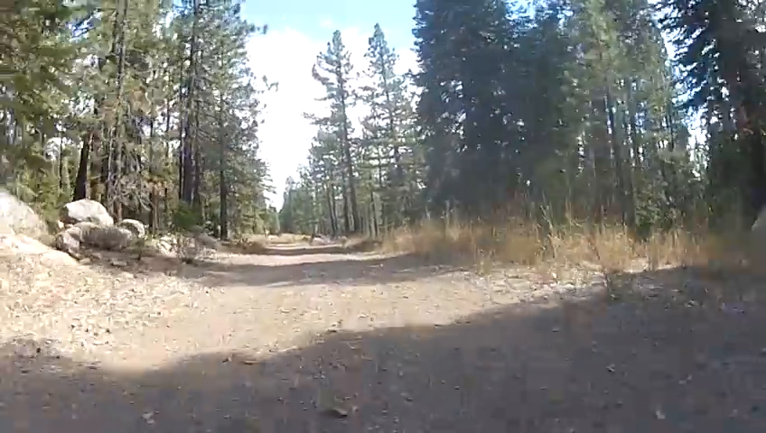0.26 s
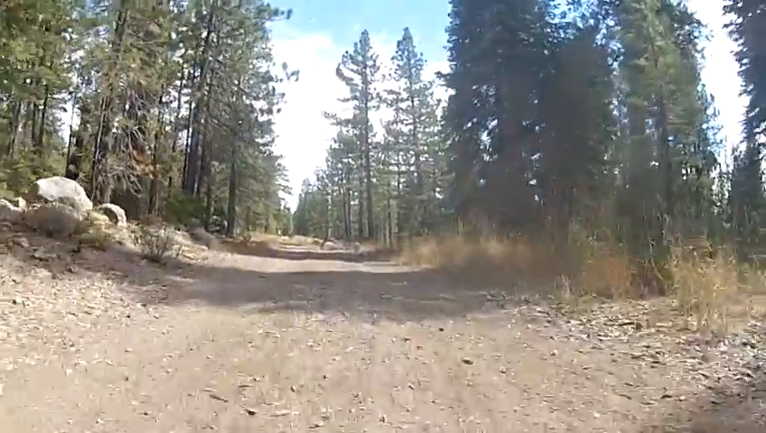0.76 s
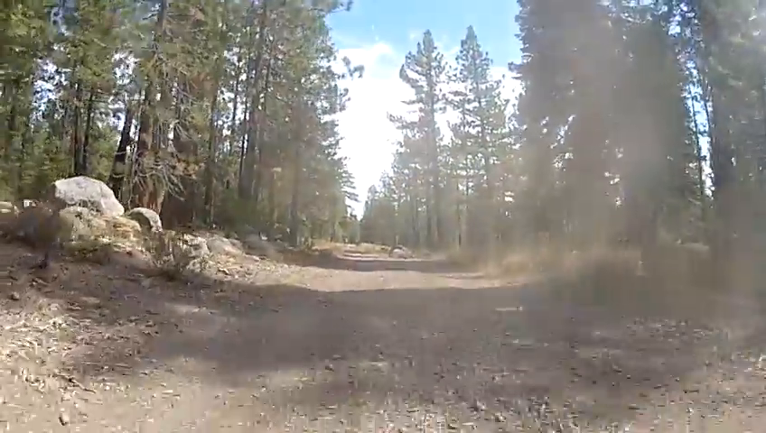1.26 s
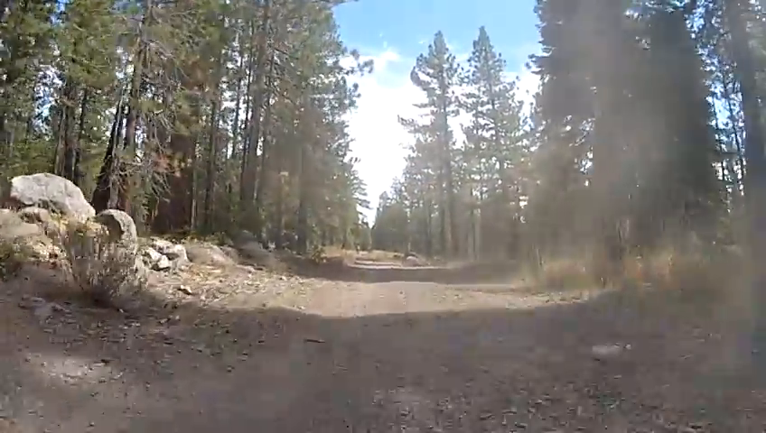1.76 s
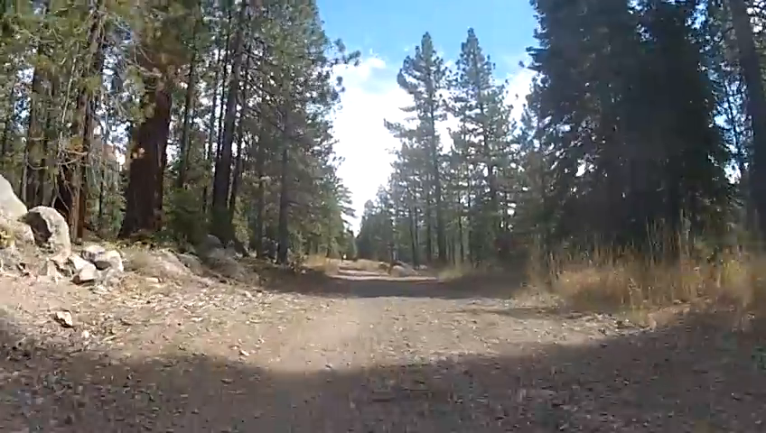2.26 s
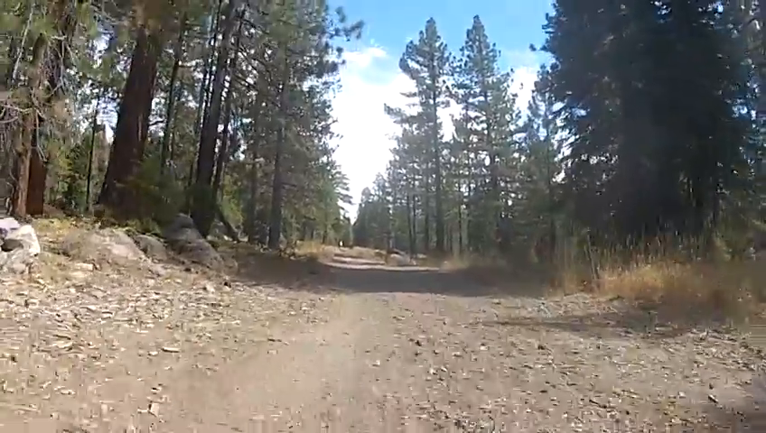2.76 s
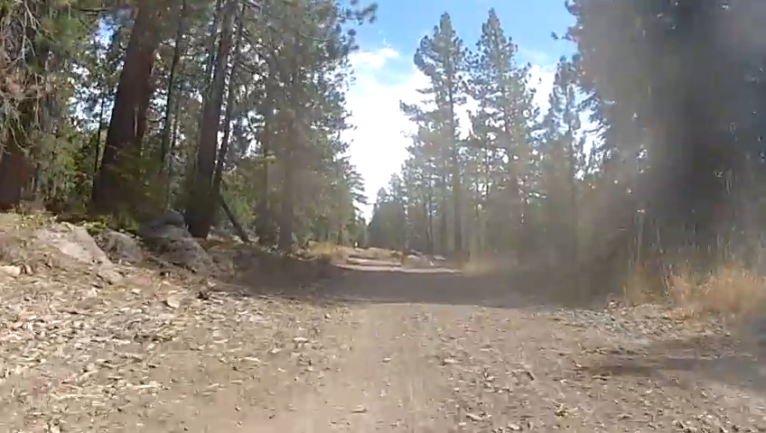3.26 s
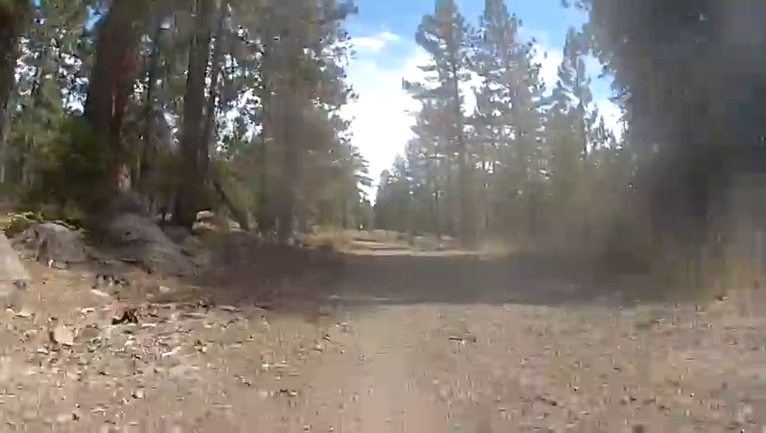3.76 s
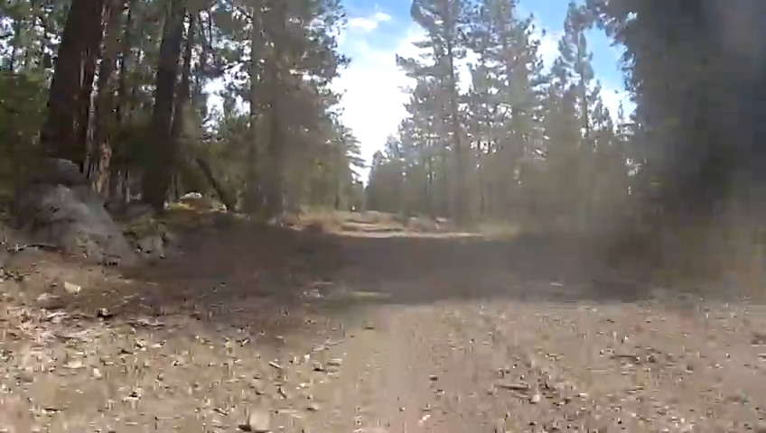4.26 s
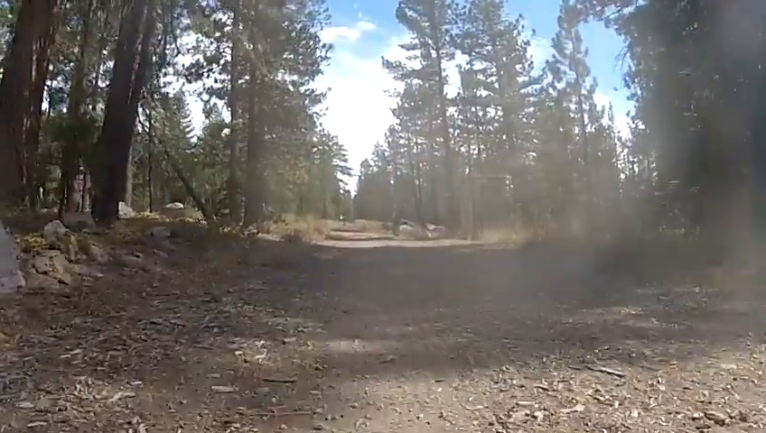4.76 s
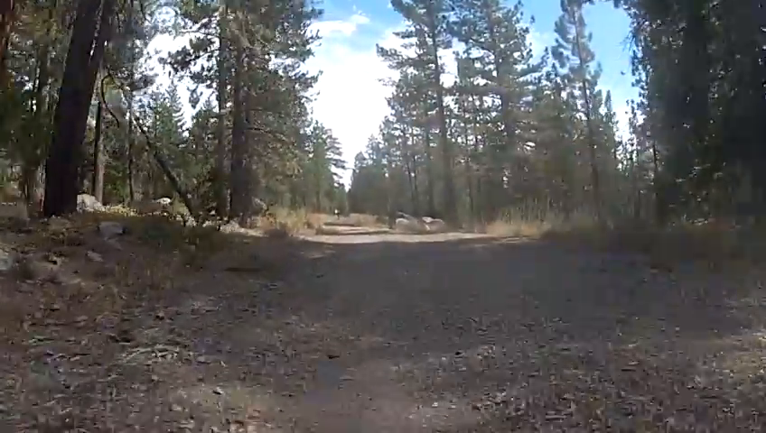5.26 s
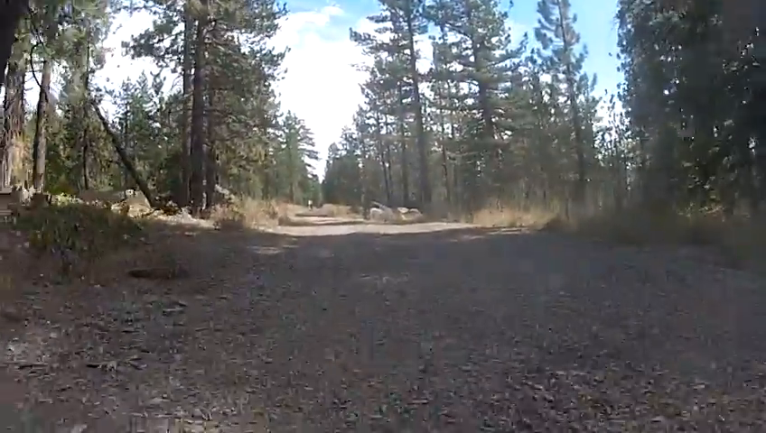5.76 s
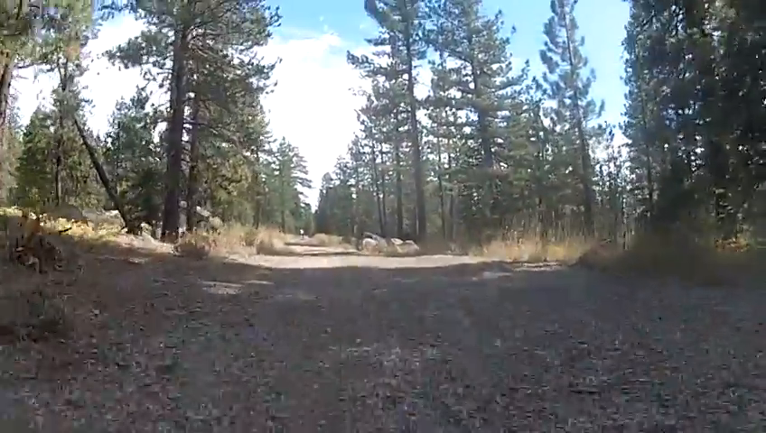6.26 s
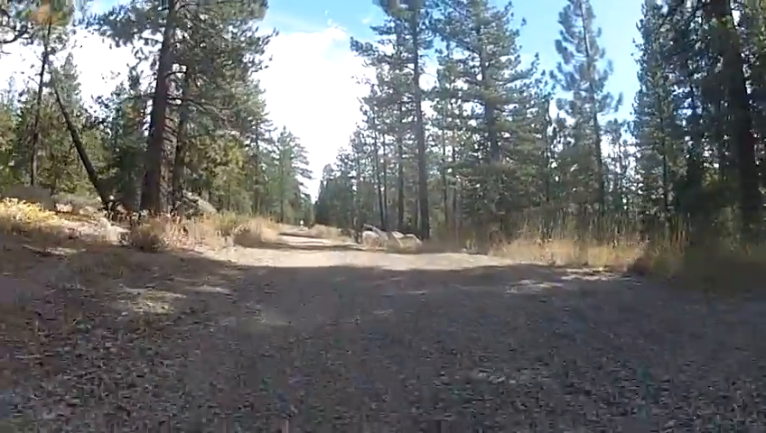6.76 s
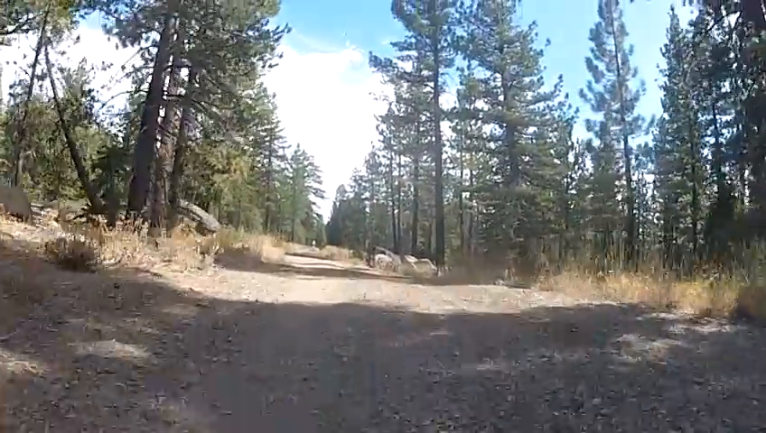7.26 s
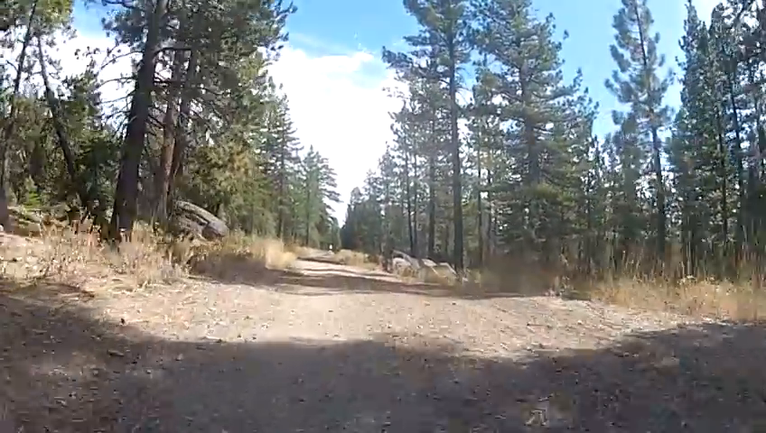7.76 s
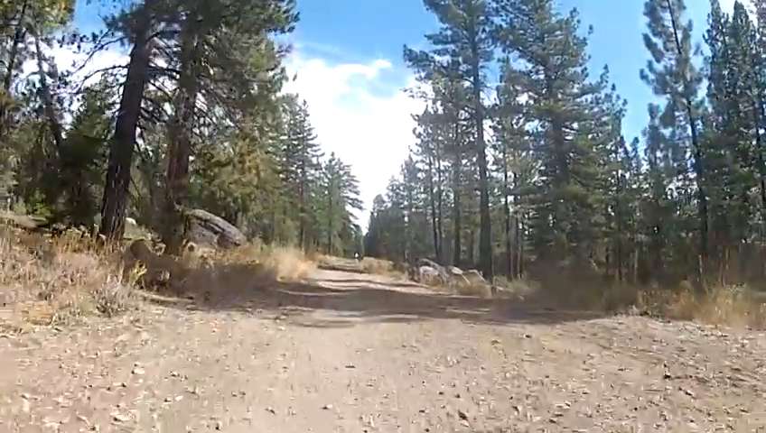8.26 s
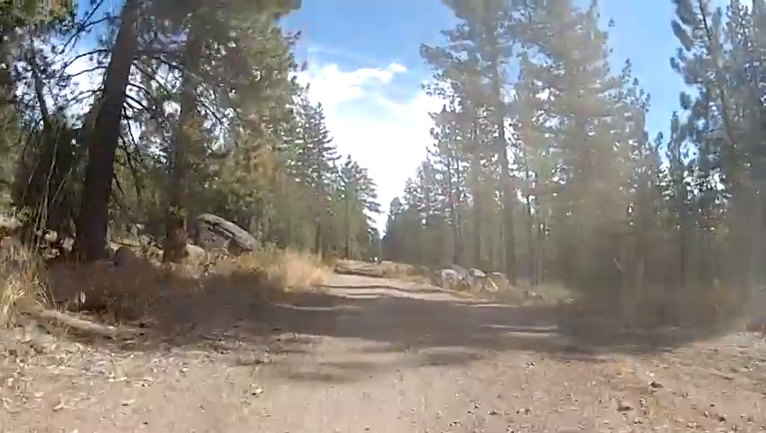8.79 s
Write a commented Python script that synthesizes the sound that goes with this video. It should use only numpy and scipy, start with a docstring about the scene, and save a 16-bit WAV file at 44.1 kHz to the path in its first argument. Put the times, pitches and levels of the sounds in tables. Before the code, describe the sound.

Wheels roll over a dirt and gravel trail for nine seconds, heard close and dry through the vehicle's frame and the microphone's mount. A low, boxy, uneven rumble and quieter gritty crunch run throughout, with a gritty, lo-fi treble. From 0 to 1 s, thuds and hard clacks crowd together, and a small loose metal part pings at about 0.85. A sharp clack lands near 2.0; bumps and snapping pebbles cluster from 2.3 to 3.4, the brightest crack near 3.1. Another clack strikes at 3.7, then a slightly calmer stretch with brief gravel slips. From 4.6 to 5.4 the rumble surges with heavy jolts, grinding stones and faint pings; a clack follows at 5.6. Clear short pings return at 6.1 and 7.15 among scattered knocks, with a solid thud at 7.6 and soft rumbling dips around 8. A last ping sounds at 8.7, final jolts at 8.8 to 8.9, still rolling.

```python
"""Wheels roll along a dirt and gravel trail for nine seconds, heard close up through the vehicle's frame.
From the start, random trains of pushes ring the resonant frame and mount, and grit crunches under the tyres.
Jolts crowd the first second, and a small metal part pings before it is over, as decaying modes, and again
now and then. Pebbles snap, most thickly near three seconds; the rumble is strong again at about five, and the
last ping and jolt come just before the end. Throughout, each sample is held, which adds a gritty treble."""
import sys
import numpy as np
from scipy import signal
from scipy.io import wavfile
from scipy.ndimage import uniform_filter1d

SR = 44100
rng = np.random.default_rng(int(sys.argv[2]) if len(sys.argv) > 2 else 0)


def transcribe(signal):
    """Save signal, clipped to [-1, 1], as a 16-bit WAV file at the path in sys.argv[1]."""
    frames = np.atleast_2d(signal).T
    limited = np.clip(frames, -1, 1)
    pcm = np.round(limited * 32767).astype(np.int16)
    wavfile.write(sys.argv[1], SR, pcm)


N = 398223
TIME = np.arange(N) / SR


def gain_of(db):
    """Level law: decibels to amplitude."""
    return 10 ** (np.asarray(db) / 20)


def evened(x):
    """Normalisation: scales to an rms of one."""
    return x / np.sqrt(np.mean(x ** 2) + 1e-20)


def add(mix, start_s, sound):
    """Superposition: mixes a sound in at a time."""
    part = mix[max(round(start_s * SR), 0):][:len(sound)]
    part += sound[:len(part)]


def power(x, size):
    """Short-time power: running mean square over size samples."""
    return abs(uniform_filter1d(x ** 2, size)) + 1e-14


def peaked(x, size=256):
    """Normalisation: scales a hit so that its loudest few milliseconds have an rms of one."""
    return x / np.sqrt(power(x, size).max())


def response(force, modes=(), size=8192):
    """Minimum phase: the causal ring of a resonant part struck with this force spectrum."""
    hz = abs(np.fft.fftfreq(size, 1 / SR))
    force_hz, force_db = np.transpose(force)
    gain = gain_of(np.interp(np.log(hz + 1), np.log(force_hz), force_db))
    if len(modes):
        # each mode is a resonance curve in power, with its width between half-power points
        resonance = sum(gain_of(db) ** 2 / (1 + (2 * (hz - centre) / width) ** 2)
                        for centre, width, db in modes)
        gain = gain * np.sqrt(resonance)
    # the Hilbert transform of the log gain supplies the phase
    log_spectrum = np.conj(signal.hilbert(np.log(gain + 1e-6)))
    return np.fft.ifft(np.exp(log_spectrum)).real[:size // 2]


def contacts(per_s, spread_db):
    """Poisson impulses: a random train of stone pushes whose sizes scatter exponentially in decibels."""
    size = gain_of(spread_db * np.minimum(rng.exponential(1, N), 4))
    sign = rng.choice([-1., 1.], N)
    return sign * size * (rng.random(N) < per_s / SR)


def clumps(depth_db, size):
    """Shot noise: uneven ground as a gain that rises at each patch of stones and decays over size samples."""
    patches = rng.exponential(1, N) * (rng.random(N) < 1 / size)
    decay = np.exp(-np.arange(6 * size) / size)
    swell = signal.oaconvolve(patches, decay)[:N]
    return gain_of(depth_db * np.tanh(evened(swell - swell.mean()) / 2) * 2)


def shaken(drive, ring, size):
    """Linear response: a part driven by many pushes, evened to unit level over spans of size samples."""
    x = signal.oaconvolve(drive, ring)[:N]
    return x / np.sqrt(uniform_filter1d(power(x, size), size // 2))


def scrape(ring, rise_s, fall_s, size=2048):
    """Friction noise: one brief rough contact swells, dies and leaves a part ringing."""
    t = np.arange(size) / SR
    envelope = (1 - np.exp(-t / rise_s)) * np.exp(-t / fall_s)
    force = rng.standard_normal(size) * envelope
    return peaked(signal.fftconvolve(force, ring))


def stone_ring(hz, cycles, size=1024):
    """Damped oscillation: a blow rings at one pitch and falls by a factor e in this many cycles."""
    turns = hz * np.arange(size) / SR
    return np.sin(2 * np.pi * turns) * np.exp(-turns / cycles)


def rolling(frame, panel, mount, case, rumble, crunch):
    """Random vibration: countless small stones shake frame and panels, rattle the mount and crunch."""
    boom_db, panel_db, rattle_db = -4.5, -2.5, -17.5  # relative weights of the shaken parts
    ground = clumps(depth_db=2.0, size=500)
    lurch = clumps(depth_db=0.96, size=1800)
    body = gain_of(boom_db) * shaken(contacts(per_s=900, spread_db=-0.5), frame, size=4000)
    body += gain_of(panel_db) * shaken(ground * contacts(per_s=1400, spread_db=1.0), panel, size=4000)
    body += gain_of(rattle_db) * shaken(ground * contacts(per_s=1500, spread_db=2.5), mount, size=4000)
    grit = ground * clumps(depth_db=6.0, size=250) * contacts(per_s=4000, spread_db=4.0)
    return lurch * (rumble * body + crunch * shaken(grit, case, size=4000))


# the trail's roughness under the wheels, levels before each source's own trim:
# start_s [s], rumble_db [dB], crunch_db [dB], heave_db [dB]
TRAIL = [(0.0, -15, -39, -30), (0.53, -20, -42, -38), (0.73, -22.5, -43.5, -38.5), (1.18, -21, -44.5, -41),
         (1.38, -21.5, -45, -40.5), (1.61, -21.5, -40.5, -39), (2.01, -20, -45, -42),
         (2.72, -19.5, -41.5, -37), (3.09, -24.5, -45.5, -48), (3.24, -24.5, -38, -48),
         (3.42, -20.5, -41, -41), (3.82, -20, -46.5, -41), (4.0, -24, -44.5, -38.5), (4.6, -15, -42.5, -37),
         (4.98, -21, -45, -40), (5.15, -16, -35.5, -40), (5.36, -14, -40, -31), (5.73, -20, -44, -41),
         (6.24, -18, -38.5, -38), (6.51, -17.5, -43.5, -35), (6.74, -18.5, -41, -48),
         (7.09, -17, -39, -34.5), (7.52, -18, -44, -45), (8.0, -20.5, -42.5, -37), (8.4, -23, -43, -40),
         (9.03, -20.5, -40.5, -39)]
# the wheels ride through a soft dip in the dirt and the body rumbles up:
# start_s [s], length_s [s], level_db [dB]
DIPS = [(0.233, 0.095, -13.5), (0.97, 0.05, -18), (1.238, 0.049, -19), (3.521, 0.082, -18.5),
        (3.761, 0.017, -10), (4.02, 0.043, -27.5), (4.736, 0.033, -8.5), (7.208, 0.053, -14),
        (7.391, 0.032, -14), (7.857, 0.05, -17), (8.017, 0.024, -10.5), (8.078, 0.093, -16),
        (8.213, 0.11, -15.5), (8.419, 0.05, -16.5)]


def ride():
    """Power addition: rumble and crunch follow the trail, swell at listed jolts, rumble also in dips."""
    shudder_db, shudder_s = -5, 0.038  # the body shudders on after a jolt
    spill_db, spill_s = -14, 0.019  # and the disturbed gravel settles
    climb_s = 0.0053  # both swell as the tyre climbs the stone
    at, rumble_db, crunch_db, _ = np.transpose(TRAIL)
    rumble = gain_of(np.interp(TIME, at, rumble_db)) ** 2
    crunch = gain_of(np.interp(TIME, at, crunch_db)) ** 2
    for start_s, _, thud_db, grind_db, *_ in JOLTS:
        near = slice(max(round((start_s - .5) * SR), 0), round((start_s + .5) * SR))
        before = np.maximum(start_s - TIME[near], 0)
        after = np.maximum(TIME[near] - start_s, 0)
        shudder = np.exp(-before / climb_s - after / shudder_s)
        spill = np.exp(-before / climb_s - after / spill_s)
        rumble[near] += (gain_of(thud_db + shudder_db) * shudder) ** 2
        crunch[near] += (gain_of(grind_db + spill_db) * spill) ** 2
    for start_s, length_s, level_db in DIPS:
        arch = np.sin(np.pi * np.arange(0, length_s, 1 / SR) / length_s)
        add(rumble, start_s, (gain_of(level_db) * arch) ** 2)
    return np.sqrt(rumble), np.sqrt(crunch)


# the wheel hits a large stone or rut, levels before each layer's trim:
# start_s [s], clack_db [dB], thud_db [dB], crunch_db [dB], thud_hz [Hz], stone_hz [Hz]
JOLTS = [(0.01, -13, -10, -26, 218, 3060), (0.032, -23, -4.5, -29, 208, 2440),
         (0.124, -15.5, -10.5, -22.5, 369, 2410), (0.155, -17, -5.5, -27, 196, 2800),
         (0.323, -14, -12, -24, 134, 1700), (0.347, -9, -13.5, -18, 221, 1940),
         (0.377, -7, -10, -29, 320, 3020), (0.522, -13.5, -12, -24.5, 213, 2670),
         (0.617, -8.5, -3, -24.5, 200, 1930), (0.769, -16, -12.5, -25, 403, 1900),
         (0.914, -23, -20, -29, 400, 2420), (0.969, -39, -11, -31.5, 127, 2480),
         (1.063, -15, -10, -25.5, 395, 2540), (1.177, -19, -11, -31, 277, 1890),
         (1.238, -18, -15, -45, 217, 2700), (1.562, -16.5, -11, -31, 346, 1930),
         (1.605, -15.5, -14, -24, 192, 1920), (1.952, -25, -10, -28, 204, 2190),
         (2.033, -3.5, -10.5, -24.5, 208, 2720), (2.123, -28, -12.5, -36, 196, 3130),
         (2.211, -43, -11.5, -42, 318, 2330), (2.312, -13, -12, -25, 306, 1720),
         (2.395, -19.5, -9.5, -26, 308, 1900), (2.472, -14, -9, -27, 127, 2700),
         (2.526, -31, -7, -28.5, 267, 1870), (2.568, -12, -13, -27.5, 400, 2140),
         (2.726, -22, -12, -48, 350, 2590), (2.759, -18.5, -16, -28.5, 116, 2670),
         (2.811, -33, -8.5, -42, 388, 2290), (2.884, -12, -7, -37, 336, 1950),
         (2.919, -25, -8.5, -33, 343, 2320), (2.956, -17.5, -10.5, -23, 186, 2610),
         (3.033, -20, -15.5, -27.5, 390, 1920), (3.258, -13.5, -7.5, -28, 366, 3300),
         (3.314, -26, -16, -26, 185, 2680), (3.371, -13, -5, -32, 355, 2040),
         (3.484, -15, -14.5, -23, 200, 2630), (3.664, -16, -26, -29.5, 404, 1870),
         (3.699, -3.5, -12.5, -26, 350, 1880), (3.82, -29, -12.5, -37, 218, 1870),
         (4.179, -14.5, -12, -30.5, 277, 1730), (4.585, -12, -6, -30, 215, 2380),
         (4.599, -10.5, -6.5, -27, 360, 1950), (4.668, -22, -7, -21.5, 283, 2230),
         (4.706, -7, -6.5, -23.5, 200, 1930), (4.735, -27, -7, -30, 375, 2900),
         (4.8, -38, -18.5, -31.5, 426, 2720), (4.934, -19, -10, -27.5, 164, 1740),
         (4.951, -14, -6.5, -33, 380, 2620), (5.084, -7.5, -6.5, -16, 304, 2350),
         (5.319, -19, -24, -24, 363, 1870), (5.505, -15.5, -26, -24.5, 385, 2030),
         (5.568, -4, -10.5, -24, 217, 2150), (5.706, -16, -9, -40, 121, 2670),
         (5.86, -40, -11.5, -37, 352, 1900), (5.946, -14.5, -18, -23.5, 423, 2330),
         (6.011, -26, -12.5, -24.5, 390, 1880), (6.109, -19, -10.5, -36, 244, 2320),
         (6.329, -11.5, -10, -23.5, 226, 2290), (6.356, -14, -9.5, -24, 250, 1920),
         (6.471, -7.5, -8, -30, 344, 1870), (6.743, -18, -9.5, -45, 220, 1940),
         (6.871, -14, -30, -20.5, 390, 2320), (7.1, -18, -9.5, -29, 383, 2300),
         (7.329, -9, -15, -50, 217, 1920), (7.611, -13, -5, -30, 288, 1900),
         (7.774, -20, -20, -24, 406, 2590), (7.801, -27, -12, -24, 124, 2580),
         (7.988, -19, -18, -43, 307, 2090), (8.052, -30, -9.5, -28.5, 130, 3470),
         (8.655, -25, -9.5, -31, 363, 2720), (8.82, -18, -15, -26.5, 350, 2300),
         (8.923, -21, -13, -46, 388, 2260)]


def jolts(body, mount, case, clack_hz=1080, clack_spread=0.31):
    """Impact excitation: each larger stone thuds into the body, clacks the mount and grinds."""
    out = np.zeros(N)
    for start_s, clack_db, thud_db, crunch_db, thud_hz, stone_hz in small_jolts() + list(JOLTS):
        # soft ruts push at a low pitch, sharp stones higher
        push = signal.fftconvolve(body, stone_ring(thud_hz, cycles=1.0))
        add(out, start_s, gain_of(thud_db - 1.76) * scrape(push, rise_s=0.0025, fall_s=0.0052))
        # no two clack alike: the pitch scatters about its median
        knock_hz = clack_hz * np.exp(clack_spread * rng.standard_normal())
        knock = signal.fftconvolve(mount, stone_ring(knock_hz, cycles=0.78))
        add(out, start_s, gain_of(clack_db - 6.5) * scrape(knock, rise_s=0.00037, fall_s=0.0092))
        grind_gain = gain_of(crunch_db - 4.5)
        add(out, start_s, grind_gain * scrape(case, rise_s=0.0002, fall_s=0.01))
        stone = stone_ring(stone_hz, cycles=4.0)
        add(out, start_s, grind_gain * scrape(stone, rise_s=0.0033, fall_s=0.0049))
    return out


def small_jolts(clack_db=-1.5, thud_db=1.0, grind_db=9.0, spread_db=0.2,
                thud_hz=(130, 430), stone_hz=(1850, 2800), count=40):
    """Stratified randomness: lesser stones, uneven in time, as strong as the trail; rows as in JOLTS."""
    when, soft, small = rng.random((count, 3)).T
    clack, thud, grind = spread_db * rng.standard_normal((count, 3)).T
    start_s = (np.arange(count) + when) / count * N / SR
    at, *levels = np.transpose(TRAIL)
    rumble, crunch, _ = (np.interp(start_s, at, db) for db in levels)
    return list(zip(start_s, rumble + clack_db + clack, rumble + thud_db + thud, crunch + grind_db + grind,
                    np.interp(soft, [0, 1], thud_hz), np.interp(small, [0, 1], stone_hz)))


# a loose metal part chatters against its seat, level before trim, pitch of its main mode:
# start_s [s], level_db [dB], pitch_hz [Hz]
PINGS = [(0.8535, -7.5, 2324), (4.6828, -20, 2375), (4.6934, -23, 2280), (5.0886, -17, 2263),
         (6.112, -8.5, 2330), (7.1537, -8, 2290), (7.9865, -23.5, 2235), (8.6886, -8.5, 2310)]
# the metal part's modes, whose pitches are scaled together at each ping:
# pitch_hz [Hz], level_db [dB, relative], t60_s [s]
METAL_MODES = [(1165, -7, 0.032), (2326, 6.5, 0.026), (2267, -27, 0.11), (3330, -11.5, 0.028),
               (4670, -10.5, 0.026)]


def pings(mount, case, swell_s=0.00452, size=4096):
    """Modal synthesis: metal modes swell and decay, and the seat passes a buzz on to mount and case."""
    out, t = np.zeros(N), np.arange(size) / SR
    hz, mode_db, t60_s = np.transpose(METAL_MODES)[:, :, None]
    for start_s, level_db, main_hz in PINGS:
        stretch = main_hz / hz[1]
        turns = hz * stretch * t + rng.random(hz.shape)
        ring = (gain_of(mode_db - 60 * t / t60_s) * np.sin(2 * np.pi * turns)).sum(0)
        chatter = 1 + 0.17 * evened(uniform_filter1d(rng.standard_normal(size), size=36))
        swell = 1 - np.exp(-(t / swell_s) ** 2)
        add(out, start_s, gain_of(level_db - 2.5) * peaked(chatter * ring * swell))
        # the case buzz starts slightly ahead of the slowly swelling ring
        add(out, start_s - swell_s / 2, gain_of(level_db - 21.5) * scrape(case, rise_s=0.0064, fall_s=0.0074))
        add(out, start_s, gain_of(level_db - 21.0) * scrape(mount, rise_s=0.0025, fall_s=0.029))
    return out


# a pebble snaps out from under a tyre, crack level before trim:
# start_s [s], crack_db [dB], ring_db [dB], pitch_hz [Hz]
SNAPS = [(0.379, -19, -27, 2940), (0.616, -33, -32.5, 4570), (1.628, -19.5, -31, 4580),
         (2.038, -25, -25.5, 2800), (2.084, -21, -28.5, 3200), (2.783, -22.5, -26.5, 3710),
         (2.9572, -21.5, -29, 2960), (3.0593, -13, -22.5, 3900), (3.1973, -26, -35, 3730),
         (3.2685, -20, -27, 3200), (3.316, -28, -28, 4750), (3.625, -25, -33, 3160),
         (4.6195, -16, -28.5, 3700), (4.736, -23, -30, 2900), (5.38, -22, -27.5, 2700),
         (5.7172, -22, -32.5, 3800), (6.3844, -43, -37, 4620), (6.9225, -22, -40, 3310),
         (8.2362, -45, -36, 4500)]
# force spectrum of the crack: frequency_hz [Hz], level_db [dB, relative]
SNAP_FORCE = [(400, -25), (1500, 2), (2500, 6.5), (3800, 2.5), (4700, 1), (5600, -0.5), (7000, -6.5)]


def snaps():
    """Impulsive release: pinched pebbles shoot out with a bright crack and a trace of their own pitch."""
    out, crack = np.zeros(N), response(SNAP_FORCE)
    for start_s, crack_db, ring_db, pitch_hz in SNAPS:
        add(out, start_s, gain_of(crack_db - 3.0) * scrape(crack, rise_s=0.00027, fall_s=0.0034))
        ring = stone_ring(pitch_hz, cycles=12.0)
        add(out, start_s, gain_of(ring_db) * scrape(ring, rise_s=0.00033, fall_s=0.0029))
    return out


# a tyre slips and grinds through loose gravel, level before each layer's trim:
# start_s [s], length_s [s], level_db [dB], pitch_hz [Hz]
SLIPS = [(0.246, 0.085, -32, 2300), (1.83, 0.032, -30.5, 2600), (3.16, 0.024, -31, 2270),
         (3.32, 0.047, -33, 2570), (4.23, 0.049, -27.5, 1890), (4.388, 0.051, -30.5, 2300),
         (4.588, 0.078, -25, 1770), (4.673, 0.049, -43, 1730), (4.964, 0.032, -29.5, 2720),
         (5.072, 0.032, -24.5, 1790), (6.028, 0.054, -29.5, 2710), (6.89, 0.028, -28, 2720),
         (8.59, 0.062, -32, 2670)]


def slips(mount, case, per_s=2500, spread_db=2.5, size=8192):
    """Granular friction: a slipping tread rubs many stones, which swell, die and rattle the mount."""
    out, t = np.zeros(N), np.arange(size) / SR
    grains = contacts(per_s, spread_db)
    for start_s, length_s, level_db, pitch_hz in SLIPS:
        swell = np.sin(np.pi * np.minimum(t / length_s, 1) ** 0.69)
        rub = np.roll(grains, -round(start_s * SR))[:size] * swell
        stones = stone_ring(pitch_hz, cycles=3.1)
        for ring, trim_db in (case, -5.0), (stones, -2.5), (mount, -1.0):
            add(out, start_s, gain_of(level_db + trim_db) * peaked(signal.fftconvolve(rub, ring)))
    return out


def pebbles(crunch, per_s=8.2, spread_db=4.0, low_hz=1700, high_hz=4600, count=24):
    """Granular synthesis: pebbles of many sizes chink in clusters, more loudly where the tread digs in."""
    out, clusters = np.zeros(N), clumps(depth_db=2.0, size=800)
    for hz in np.geomspace(low_hz, high_hz, count):
        chink = scrape(stone_ring(hz, cycles=7.1), rise_s=0.001, fall_s=0.0031)
        train = clusters * contacts(per_s, spread_db)  # per_s holds for each size
        out += signal.oaconvolve(train, chink)[:N] * (low_hz / hz) ** 0.23  # small stones are quieter
    return gain_of(-6) * crunch * evened(out)


# force spectrum of the vehicle's sway: frequency_hz [Hz], level_db [dB, relative]
SWAY_FORCE = [(8, -34), (24, -8), (39, 4), (55, 0), (85, 1), (120, -2.5), (250, -36)]


def heave():
    """Filtered noise: deep, soft rumble of the vehicle riding the trail's waves."""
    at, *_, heave_db = np.transpose(TRAIL)
    sway = shaken(rng.standard_normal(N), response(SWAY_FORCE), size=8000)
    return gain_of(np.interp(TIME, at, heave_db) + 4.5) * sway


# resonances of the frame, panels, mount and case: pitch_hz [Hz], width_hz [Hz], level_db [dB, relative]
FRAME = [(121.4, 10.1, -0.5), (179, 20, -13), (202.7, 20.5, -4)]
PANEL = [(295.7, 42, -2), (347.2, 21.6, -0.5), (383, 125, -1), (440, 10.4, -9.5)]
MOUNT = [(651.7, 25, 0.5), (725, 103, 0.5), (864, 71, -5.5), (1032, 98, -0.5), (1233, 58, -12)]
CASE = [(1530, 300, -7.5), (1887, 27, 5.5), (2300, 110, 1), (2680, 315, 3.5), (3180, 115, -2),
        (3850, 150, -1), (4574, 96, -1.5)]
# force spectra on the body, mount and case: frequency_hz [Hz], level_db [dB, relative]
BUMP_FORCE = [(30, -20), (90, -12.5), (120, -2.5), (430, 0.5), (520, -12), (800, -24.5), (1500, -17),
              (5000, -41)]
KNOCK_FORCE = [(200, -1.5), (480, 8), (650, 1), (1100, 0), (1350, -12.5), (2500, -7), (6000, -1)]
GRIT_FORCE = [(500, -18.5), (1300, 4.5), (2000, 2.5), (4500, -3), (5200, 0), (6000, 14.5)]


def scene():
    """Structure-borne sound: all reaches the microphone through frame and case, so it is close and dry."""
    frame, panel = response(BUMP_FORCE, FRAME), response(BUMP_FORCE, PANEL)
    body = response(BUMP_FORCE, FRAME + PANEL)
    mount, case = response(KNOCK_FORCE, MOUNT), response(GRIT_FORCE, CASE)
    rumble, crunch = ride()
    steady = rolling(frame, panel, mount, case, rumble, crunch) + heave() + pebbles(crunch)
    hits = jolts(body, mount, case) + slips(mount, case) + snaps() + pings(mount, case)
    return (steady + hits)[None]


def record(dry):
    """Zero-order hold: clipped, slowly sampled and held, the steps mirror the sound into the treble."""
    hold_hz, edge_hz = 12000, 15350  # sampling rate of the hold, final low-pass cutoff
    antialias = signal.firwin(3601, 5580, window=("kaiser", 3.5), fs=40 * SR)
    slow = signal.resample_poly(np.clip(dry, -1, 1), hold_hz, SR, axis=1, window=antialias)
    steps = np.repeat(slow, 8, axis=1)
    held = signal.resample_poly(steps, SR, 8 * hold_hz, axis=1)[:, :N]
    lowpass = signal.firwin(161, edge_hz, window=("kaiser", 9), fs=SR)
    return signal.oaconvolve(held, lowpass[None], "same")


dry = scene()
out = record(dry)
transcribe(out)
```